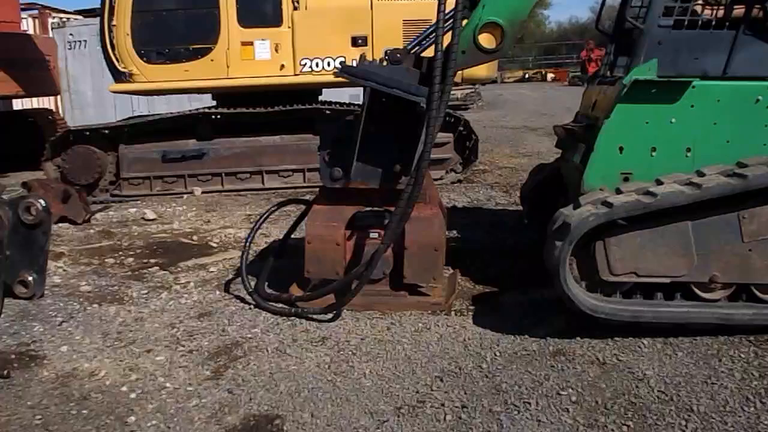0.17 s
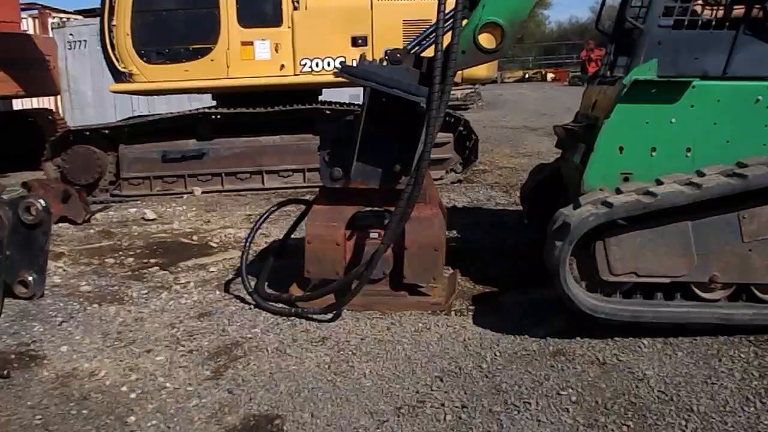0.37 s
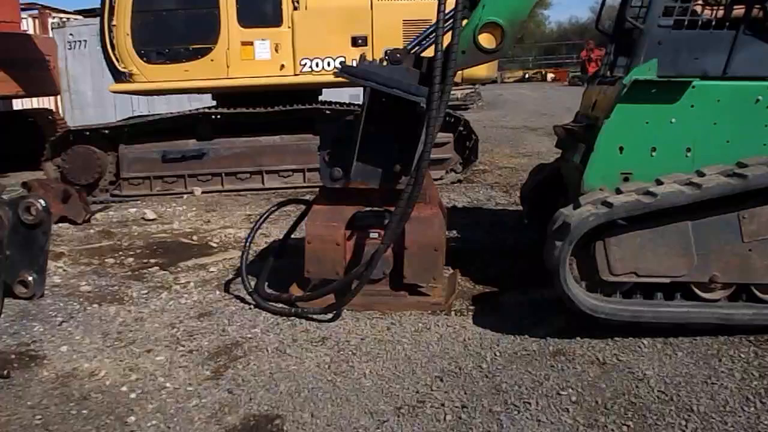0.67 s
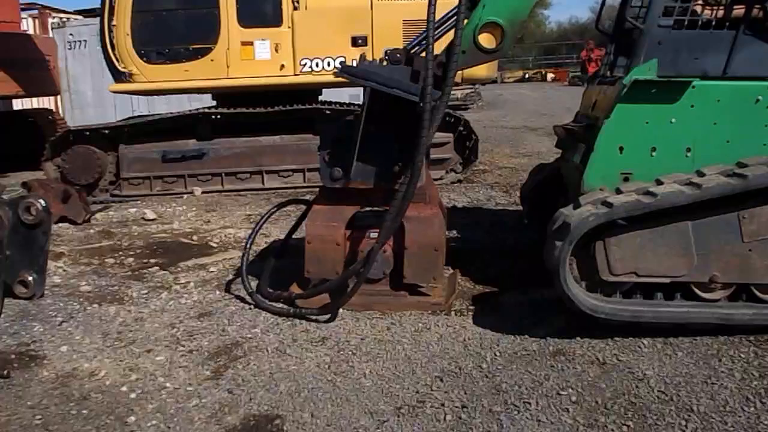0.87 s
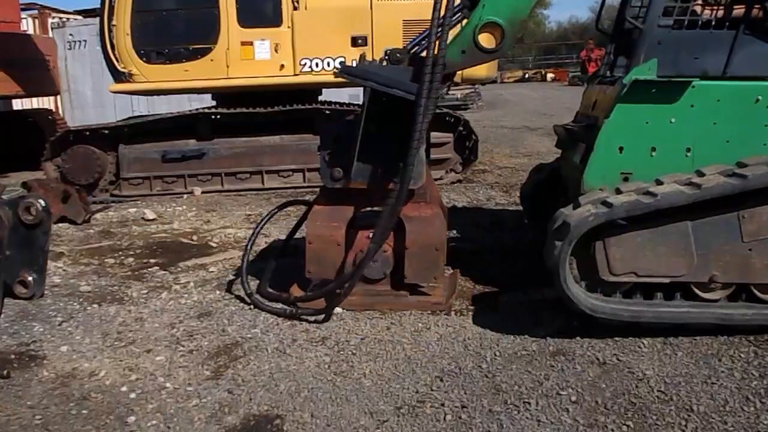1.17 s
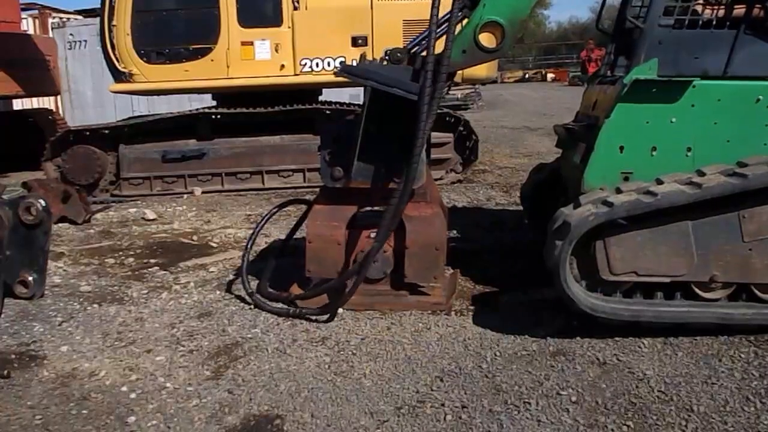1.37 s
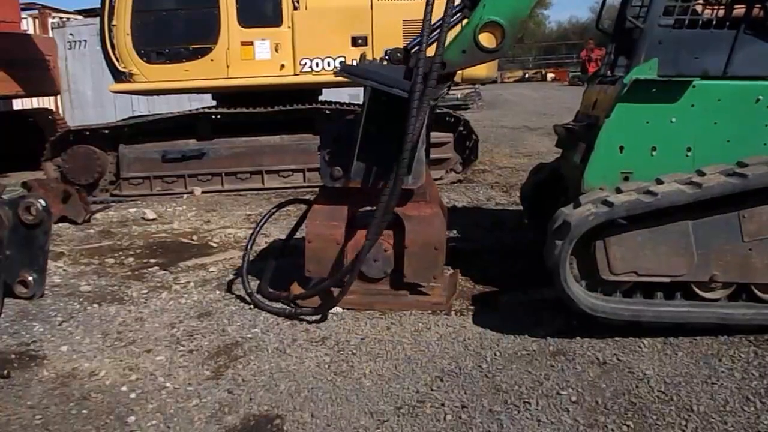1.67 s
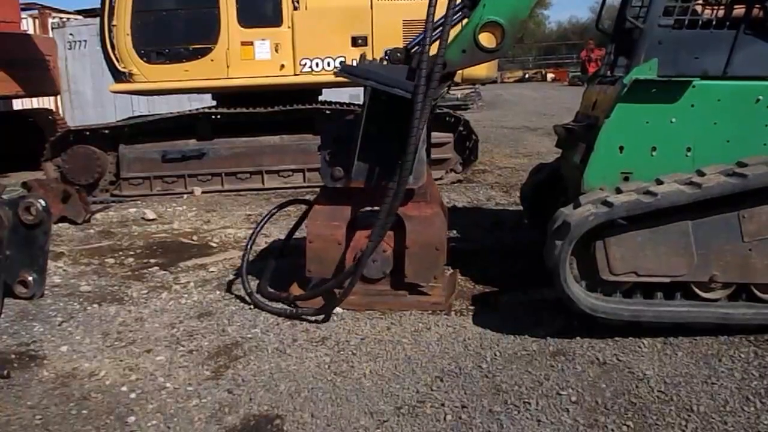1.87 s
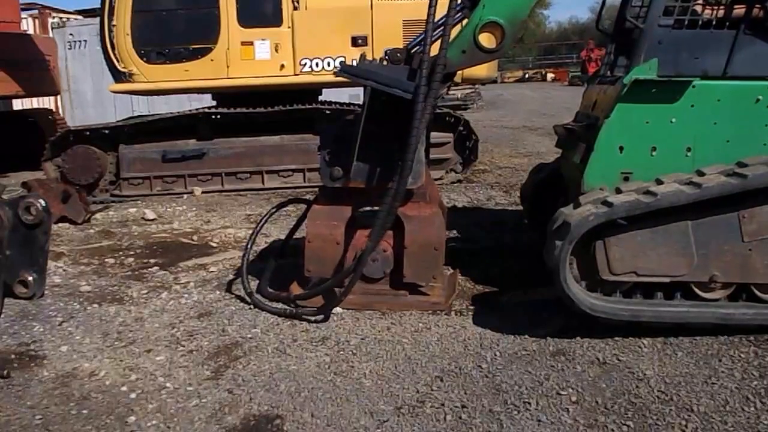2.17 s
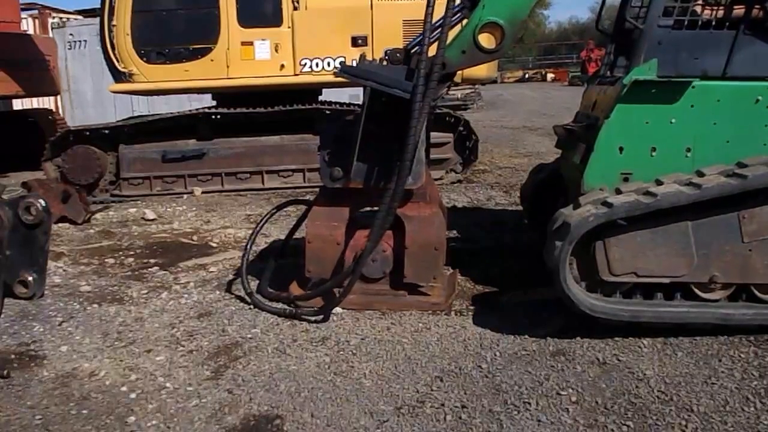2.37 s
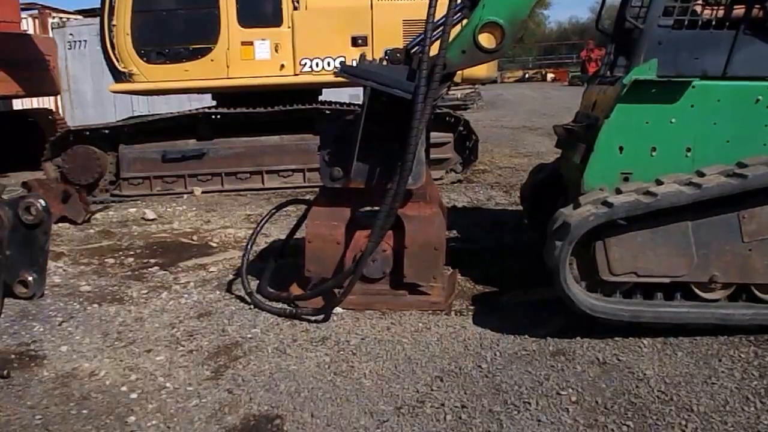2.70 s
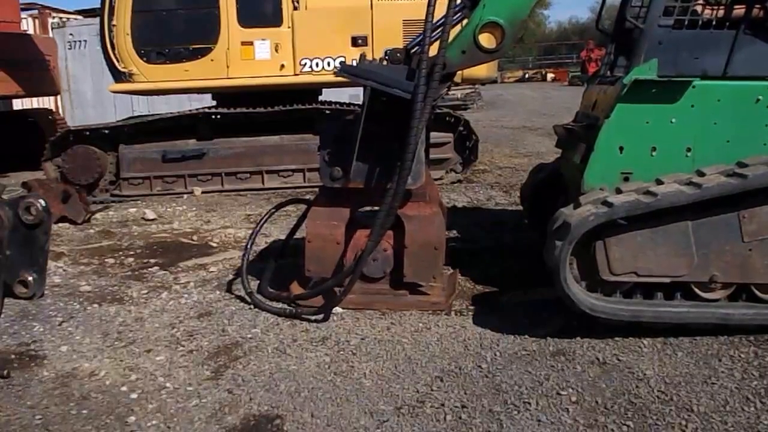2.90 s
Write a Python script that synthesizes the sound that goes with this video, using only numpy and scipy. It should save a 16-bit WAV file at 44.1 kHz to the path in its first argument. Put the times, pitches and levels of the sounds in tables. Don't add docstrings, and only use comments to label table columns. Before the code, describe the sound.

A plate compactor on a tracked loader bursts into heavy rattling blows after one second of diesel idle and hydraulic whine, heard fairly close in an open gravel yard through a slightly overloaded microphone.

```python
import sys
import numpy as np
from scipy import signal
from scipy.fft import rfft, irfft
from scipy.io import wavfile
from scipy.ndimage import uniform_filter1d, map_coordinates

SR = 44100
rng = np.random.default_rng(int(sys.argv[2]) if len(sys.argv) > 2 else 0)


def waveform_to_disk(signal):
    frames = np.transpose(np.atleast_2d(signal))
    scaled = np.clip(frames, -1, 1) * 32767
    samples = np.round(scaled).astype(np.int16)
    wavfile.write(sys.argv[1], SR, samples)


def level_to_linear(level):
    exponent = np.asarray(level, float) / 20
    return 10 ** exponent


N = 134064


def evened(x):
    return x / np.sqrt(np.mean(x ** 2) + 1e-20)


def read(points, hz):
    f, value = np.transpose(points)
    return np.interp(np.log(hz + 1), np.log(f + 1), value)


def curve(table, column):
    rows = np.array(table)
    return np.interp(np.arange(N) / SR, rows[:, 0], rows[:, column])


def coloured(x, points):
    hz = np.fft.rfftfreq(len(x), 1 / SR)
    return irfft(rfft(x) * level_to_linear(read(points, hz)), len(x))


def resonate(x, hz, width_hz):
    return signal.lfilter(*signal.iirpeak(hz, hz / width_hz, SR), x)


def patchy(patchy_db):
    real, imag, patches = rng.standard_normal((N // 128 + 5, 257, 3)).T
    patches = uniform_filter1d(patches, size=6, axis=0)
    patches = evened(uniform_filter1d(patches, size=14, axis=1))
    z = (real + 1j * imag) * level_to_linear(patchy_db * patches)
    return evened(signal.istft(z, nperseg=512, noverlap=384)[1][:N])


def bump(s, rise, fall):
    t = np.arange(N) / SR - s
    return np.exp(-.5 * (t / np.where(t < 0, rise, fall)) ** 2)


# multiple of the cycle rate, level in dB rms.
EXHAUST = [(4, -42.5), (8, -26.5), (11, -52), (12, -37), (13, -41), (14, -39), (15, -35), (16, -33),
           (18, -38), (20, -48), (21, -48), (22, -47), (24, -42), (26, -40), (28, -45), (29, -43),
           (30, -43)]
# multiple of the cycle rate, level in dB rms.
PANELS = [(38, -43), (40, -41), (41, -40), (42, -42), (43, -42), (44, -33), (47, -42), (48, -36), (52, -43),
          (53, -44), (56, -42), (58, -44), (59, -43), (62, -39), (76, -44), (113, -43), (120, -43),
          (132, -41), (144, -44), (150, -42), (272, -43)]
# frequency in Hz, level in dB per Hz.
CLATTER = [(350, -12), (700, -4.5), (800, -6.5), (1100, -2), (1800, 2.5), (2100, -7), (3400, -5.5),
           (6800, -23)]
CLATTER_DB, FIRING_DB, SCATTER_DB = -29, 4, 4
THROB_TURN, THROB_SPREAD = -.04, .14


def exhaust_panels_and_clatter(turns, idle_rate):
    size = 8192
    k = np.arange(size // 2 + 1)
    db = read(CLATTER, k * idle_rate)
    db = db + FIRING_DB * (k % 4 == 0)
    db = db + SCATTER_DB * rng.standard_normal(len(k))
    last_exhaust = EXHAUST[-1][0]
    height = level_to_linear(db) * (k > last_exhaust) * (k < 570)
    height = height * level_to_linear(CLATTER_DB) / np.linalg.norm(height)
    for order, level_db in EXHAUST + PANELS:
        height[round(order)] = level_to_linear(level_db)
    phase = rng.random(len(k))
    throb = .5 - k * THROB_TURN + THROB_SPREAD * (2 * phase - 1)
    phase = np.where(k <= last_exhaust, throb, phase)
    cycle = irfft(height * np.exp(2j * np.pi * phase), size) * size / np.sqrt(2)
    return map_coordinates(cycle, [turns % 1 * size], order=3, mode="grid-wrap")


# multiple of the cycle rate, level in dB rms.
PUMP = [(54.48, -34), (81.72, -43)]


def hydraulic_pump(turns):
    return sum(level_to_linear(db) * np.sqrt(2) * np.sin(2 * np.pi * order * turns) for order, db in PUMP)


# frequency in Hz, level in dB per Hz.
ROAR = [(40, -14), (115, -29.5), (170, -4), (700, 1.5), (900, -5), (3450, -6), (3700, -12.5), (9190, -30)]
ROAR_DB, KNOCK = -25, 0.14


def knocking_roar(turns):
    pulses = 1 + KNOCK * np.exp(-(8 * turns % 1) / .3)
    return level_to_linear(ROAR_DB) * evened(coloured(patchy(patchy_db=0.7) * pulses, ROAR))


# time in s, speed in cycles per s, engine gain in dB.
ENGINE = [(0, 12.024, 0), (1.08, 12.024, 0), (1.13, 11.9, -2), (1.19, 11.4, -9), (1.45, 11.65, -4),
          (1.75, 11.2, -9), (2.03, 11.55, -5), (2.3, 11.6, -8), (2.65, 11.65, -3), (2.9, 11.6, -8),
          (3.04, 11.5, -4)]


def engine():
    turns = np.cumsum(curve(ENGINE, column=1)) / SR
    tones = exhaust_panels_and_clatter(turns, idle_rate=ENGINE[0][1])
    return level_to_linear(curve(ENGINE, column=2)) * (tones + hydraulic_pump(turns) + knocking_roar(turns))


STONES_PER_S, STONE_CYCLES, STONE_SPREAD_DB = 4000, 9, 2.5


def stones(count=28):
    out, t = np.zeros(N), np.arange(1500) / SR
    for hz in np.geomspace(700, 9000, count):
        ring = np.sin(2 * np.pi * hz * t) * np.exp(-2 * t * hz / STONE_CYCLES)
        chance = STONES_PER_S / count * hz / 2800 / SR
        hits = (rng.random(N) < chance) * rng.choice([-1., 1.], N)
        hits = hits * level_to_linear(STONE_SPREAD_DB * np.minimum(rng.exponential(1, N), 3))
        out += signal.oaconvolve(hits, ring / np.linalg.norm(ring))[:N]
    return evened(out)


# frequency in Hz, width in Hz, level in dB.
STEEL = [(930, 160, -14), (2420, 59, -10), (3930, 45, -11), (5020, 48, -12)]
# frequency in Hz, level in dB per Hz.
RATTLE = [(40, -23), (70, -3.5), (100, -2), (221, 3), (1700, -12.5), (3200, -12), (5000, -16.5),
          (9190, -32.5)]
STEEL_DB, GRAINS_PER_S, GRAIN_DB, STONE_SHARE = -24, 2500, 4, .7


def steel_and_gravel():
    clicks = (rng.random(N) < GRAINS_PER_S / SR) * level_to_linear(GRAIN_DB * np.minimum(rng.exponential(1, N), 4))
    clicks = evened(clicks * rng.choice([-1., 1.], N))
    grains = clicks * .35 + STONE_SHARE * stones() + .8 * patchy(patchy_db=1.5)
    rings = sum(level_to_linear(db) * resonate(grains, hz, width) for hz, width, db in STEEL)
    return evened(coloured(evened(grains) + level_to_linear(STEEL_DB) * evened(rings), RATTLE))


# time in s, steel and gravel level in dB, ground rumble level in dB.
SHAKE = [(0.95, -49.5, -42.5), (1.08, -29, -28), (1.2, -24, -16.5), (1.35, -20, -19.5), (1.5, -21.5, -20.5),
         (1.7, -19, -19.5), (1.9, -17, -21), (2.05, -19, -17), (2.25, -17.5, -19), (2.45, -19.5, -19.5),
         (2.7, -18, -20.5), (3.04, -17.5, -19.5)]
# time in s, rattle level in dB, brightness in dB.
BLOWS = [(1.107, -28.5, -15), (1.156, -23.5, -11), (1.194, -16.5, -21), (1.238, -10.5, -8.5),
         (1.285, -12.5, -9), (1.323, -20.5, -6), (1.345, -26, -18.5), (1.376, -20.5, 1),
         (1.419, -28.5, -1), (1.454, -25, 4), (1.51, -20.5, -19), (1.554, -16, -2.5), (1.608, -14, -4),
         (1.656, -13.5, -7), (1.688, -24, 7), (1.754, -28, 8), (1.804, -21, -4.5), (1.864, -17, -9),
         (1.902, -17.5, -10), (1.952, -17, -3.5), (1.989, -16.5, -11), (2.033, -27, -0.5),
         (2.082, -22.5, 0.5), (2.122, -20, -15), (2.163, -17.5, -4), (2.212, -15.5, -8.5),
           (2.258, -16, -4.5), (2.305, -18, -9.5), (2.356, -20, -6), (2.398, -17.5, -2),
           (2.443, -22.5, -0.5), (2.5, -16, -8), (2.545, -16, -4), (2.583, -15, -2.5), (2.634, -28, -9),
           (2.672, -23, -18), (2.708, -21.5, -14), (2.766, -27, 2), (2.795, -32, 10), (2.847, -19.0, -2),
           (2.906, -26, 4.5), (2.948, -21, -26), (2.998, -15, -10), (3.032, -40, -20)]
RISE_S, FALL_S = 0.015, 0.015


def rattle():
    sound = steel_and_gravel()
    low = signal.sosfiltfilt(signal.butter(4, 520, fs=SR, output="sos"), sound)
    high = signal.sosfiltfilt(signal.butter(3, 2500, "high", fs=SR, output="sos"), sound)
    shake = np.where(np.arange(N) / SR < SHAKE[0][0], 0, level_to_linear(curve(SHAKE, column=1)) ** 2)
    body, bright = shake, shake
    for s, db, bright_db in BLOWS:
        swell = bump(s, RISE_S, FALL_S) ** 2
        body = body + swell * level_to_linear(db + 0.34) ** 2
        bright = bright + swell * level_to_linear(db + bright_db + 4.0) ** 2
    rumble = (shake > 0) * level_to_linear(curve(SHAKE, column=2)) * low
    return np.sqrt(body) * (sound - low - high) + np.sqrt(bright) * high + rumble


# time in s, level in dB, frequency in Hz.
THUDS = [(1.197, -10, 384), (1.21, -13.5, 115), (1.86, -14, 294), (2.045, -16, 258), (1.06, -17, 309),
         (1.13, -15, 366), (1.106, -22, 188), (1.155, -31, 226), (1.196, -22.5, 199), (1.251, -21.5, 199),
         (1.324, -7.5, 255), (1.364, -9.5, 180), (1.438, -12, 113), (1.539, -18, 236), (1.575, -33, 193),
         (1.627, -16.5, 161), (1.681, -8, 137), (1.758, -29.5, 333), (1.893, -11.5, 273),
         (1.928, -13.5, 281), (1.962, -10, 190), (2.0, -13, 232), (2.03, -13, 130), (2.061, -12.5, 166),
         (2.082, -12.5, 295), (2.166, -9.5, 421), (2.136, -6, 214), (2.231, -15.5, 195), (2.27, -27, 234),
         (2.355, -10, 207), (2.5, -10.5, 549), (2.79, -13, 490), (2.99, -10.5, 538), (2.563, -10, 210),
         (2.61, -13, 179), (2.645, -12, 204), (2.695, -13, 214), (2.736, -11.5, 214), (2.781, -9, 229),
         (2.877, -5.5, 231), (2.925, -26.5, 216), (2.967, -14, 220), (3.01, -10, 241)]
THUD_S, THUD_DB = 0.014, -10


def thuds():
    t = np.arange(N) / SR
    return sum(level_to_linear(db + THUD_DB) * bump(s, THUD_S, 0.63 * THUD_S) * np.sin(2 * np.pi * hz * (t - s))
               for s, db, hz in THUDS)


# time in s, peak level in dB, ring frequency in Hz.
KNOCKS = [(1.103, -5.5, 597), (1.232, -6.5, 2534), (1.232, -2, 1123), (1.273, -8, 830), (1.285, -11, 956),
          (1.415, -10, 1110), (1.452, -6, 910), (1.499, -16, 1084), (1.52, -11.5, 1020), (1.539, -4.5, 625),
          (1.552, -8.5, 933), (1.6, -0.5, 936), (1.642, -3, 1366), (1.753, -2.5, 658), (1.8, -9.5, 930),
          (1.841, -9, 986), (2.03, -9, 708), (2.062, -7, 840), (2.08, -0.5, 940), (2.117, -3.5, 923),
          (2.154, -7.5, 887), (2.202, -22, 766), (2.248, 1, 1334), (2.302, -5.5, 890), (2.339, -14, 930),
          (2.349, -10.5, 1260), (2.382, -3.5, 953), (2.54, -3, 830), (2.582, -8.5, 830),
          (2.763, -10.5, 777), (2.883, -10.5, 796), (2.889, -11.5, 1070), (2.907, -12, 740),
          (2.945, -7, 1404)]
KNOCK_DB, KNOCK_T60_S, OVERTONE_DB, BOUNCE_S, BOUNCE_DB = -8, .018, -2, .004, -2


def knocks():
    out, t = np.zeros(N + SR), np.arange(3000) / SR
    for (s, db, hz), chance in zip(KNOCKS, rng.random((len(KNOCKS), 4))):
        ring = np.sin(2 * np.pi * hz * t) * level_to_linear(-60 * t / KNOCK_T60_S)
        overtone = np.sin(2 * np.pi * hz * (1.7 + 1.5 * chance[0]) * t)
        ring = ring + level_to_linear(OVERTONE_DB - 120 * t / KNOCK_T60_S) * overtone
        for k in range(3):
            at = round((s + k * BOUNCE_S * (.6 + .8 * chance[k + 1])) * SR)
            out[at:at + len(t)] += level_to_linear(db + KNOCK_DB + k * BOUNCE_DB) * ring
    return out[:N]


# time in s, frequency in Hz, level in dB.
GROAN = [
    (2.5, 205, -48),
    (2.56, 215, -35),
    (2.63, 212, -44),
    (2.7, 218, -33),
    (2.79, 224, -33),
    (2.83, 225, -45),
    (2.88, 226, -33),
    (2.93, 227, -45),
    (3.0, 228, -34),
]
GROAN_ROUGH, GROAN_WIDTH_HZ = .8, 30


def rising_groan():
    tone = np.sqrt(2) * np.sin(2 * np.pi * np.cumsum(curve(GROAN, column=1)) / SR)
    slow = signal.lfilter(*signal.butter(2, GROAN_WIDTH_HZ, fs=SR), rng.standard_normal(N))
    groan = level_to_linear(curve(GROAN, column=2)) * tone * (1 + GROAN_ROUGH * evened(slow))
    return groan * (np.arange(N) / SR > GROAN[0][0])


def scene():
    return (engine() + rattle() + thuds() + knocks() + rising_groan())[None]


# time in s, depth in dB, hold in s.
DUCKS = [
    (1.25, 2, .012),
    (1.379, 5, .03),
    (1.809, 3, .018),
    (2.0855, 7, .021),
    (2.169, 7, .03),
    (2.738, 3, .015),
]


def level_dips(x):
    t = np.arange(N) / SR
    duck_db = 0
    for s, db, hold in DUCKS:
        attack = np.clip((t - s) / .001, 0, 1)
        release = np.clip(1 - (t - s - hold) / .004, 0, 1)
        duck_db = duck_db + db * attack * release
    return x * level_to_linear(-duck_db)


# frequency in Hz, level in dB.
TOP = [(5500, -1), (6720, -7), (6860, -57), (7140, -63), (7220, -11), (8120, -5), (8350, -55.5),
       (8700, -51), (8850, -10)]
EDGE_HZ, LIMIT = 9450, 1.3


def microphone(x):
    edge = [(EDGE_HZ, -8), (EDGE_HZ * 1.02, -68)]
    return coloured(LIMIT * np.tanh(x / LIMIT), TOP + edge)


# start in s, end in s.
FLICKER = [
    (1.2, 1.25),
    (1.335, 1.565),
    (2.03, 2.075),
    (2.172, 2.21),
    (2.36, 2.405),
]
FLICKER_HZ, KEEP_FLICKER, HOLE_LEVEL = 6250, .4, .8


def thin_treble(x):
    hz, t, z = signal.stft(x, SR, nperseg=1024, noverlap=768)
    holes = uniform_filter1d(rng.standard_normal(z.shape), size=4, axis=0)
    holes = evened(uniform_filter1d(holes, size=22, axis=1))
    keep = (holes < HOLE_LEVEL) | (hz < FLICKER_HZ)[:, None]
    x = signal.istft(z * keep, SR, nperseg=1024, noverlap=768)[1][:N]

    hz, t, z = signal.stft(x, SR, nperseg=256, noverlap=192)
    chance = rng.random((len(hz) // 4 + 1, len(t) // 6 + 1))
    chance = chance.repeat(4, axis=0).repeat(6, axis=1)[:len(hz), :len(t)]
    flickering = sum((t > a) & (t < b) for a, b in FLICKER) > 0
    keep = (chance < KEEP_FLICKER) | ~flickering | (hz < FLICKER_HZ)[:, None]
    return signal.istft(z * keep, SR, nperseg=256, noverlap=192)[1][:N]


def band_limit(x):
    return signal.sosfilt(signal.butter(12, 9340, fs=SR, output="sos"), x)


def record(dry):
    mix = thin_treble(microphone(level_dips(dry[0])))
    return band_limit(mix[None])


dry = scene()
out = record(dry)
waveform_to_disk(out)
```